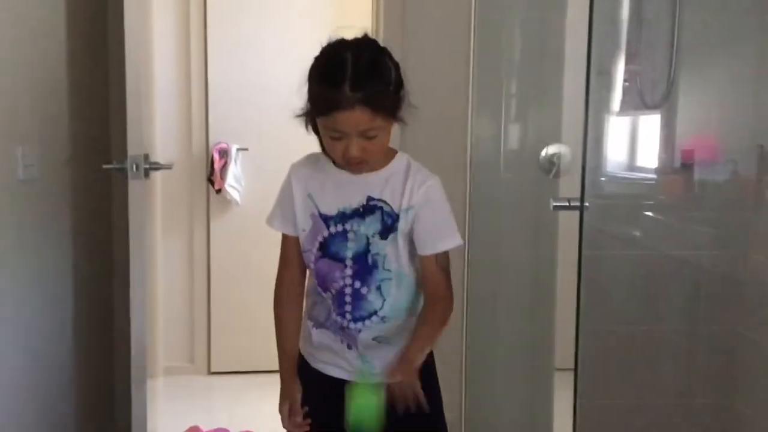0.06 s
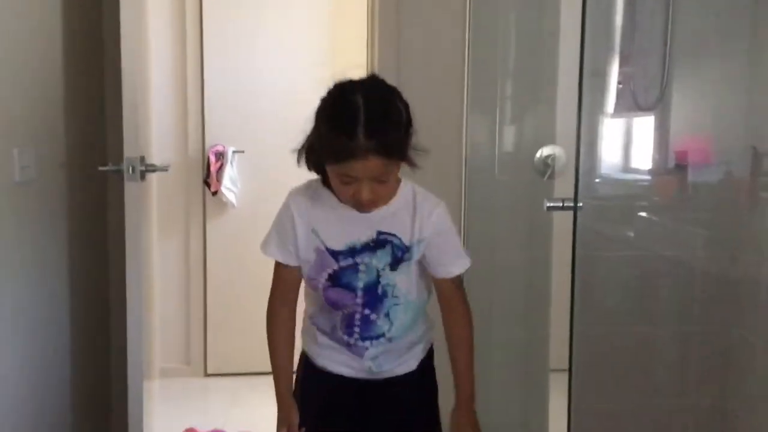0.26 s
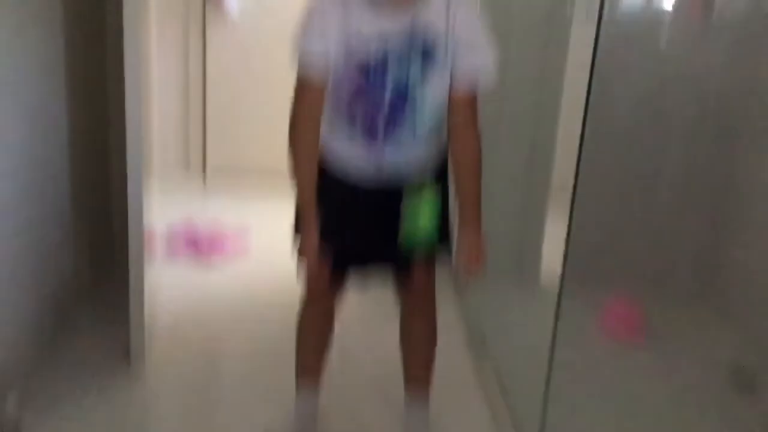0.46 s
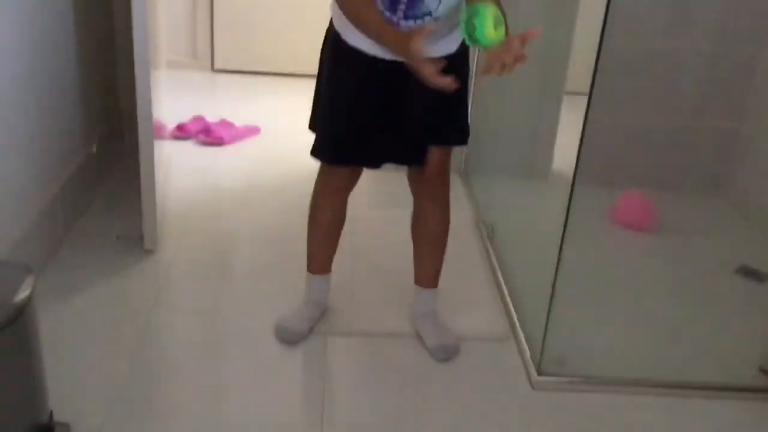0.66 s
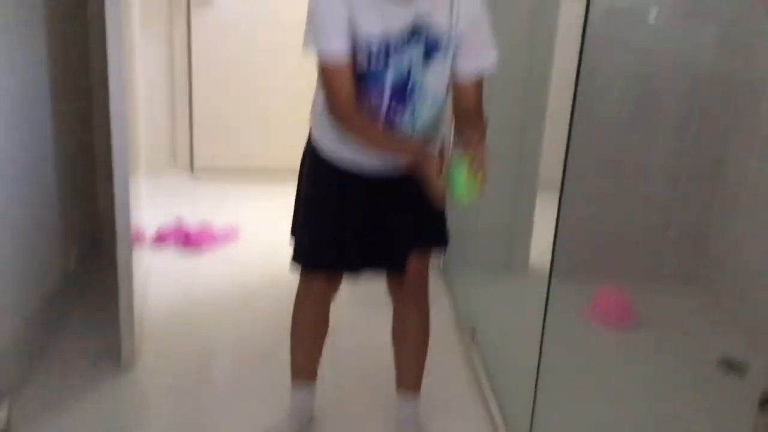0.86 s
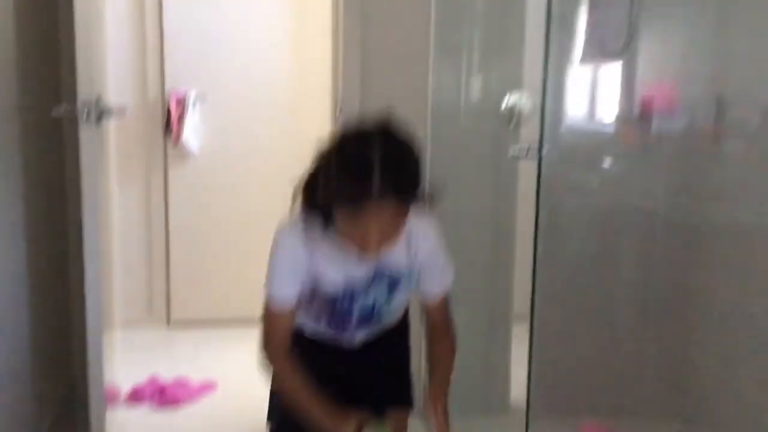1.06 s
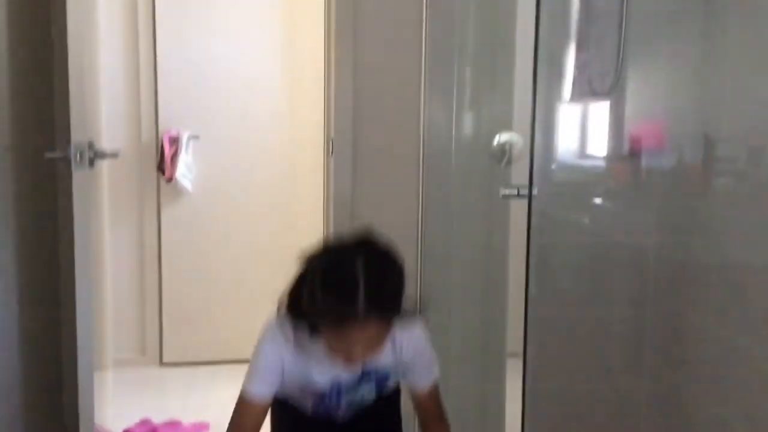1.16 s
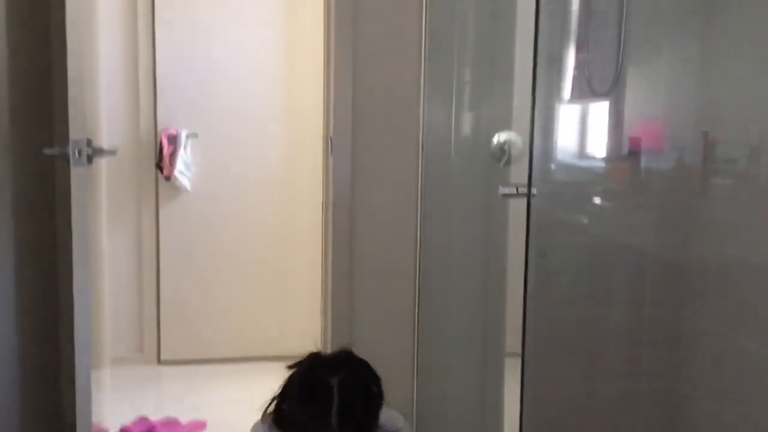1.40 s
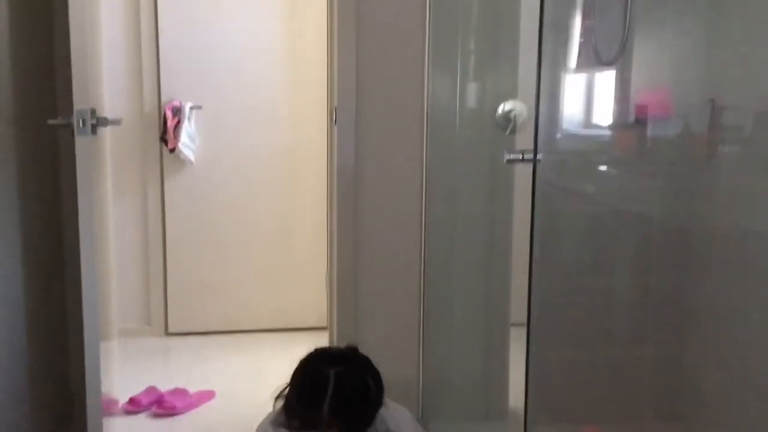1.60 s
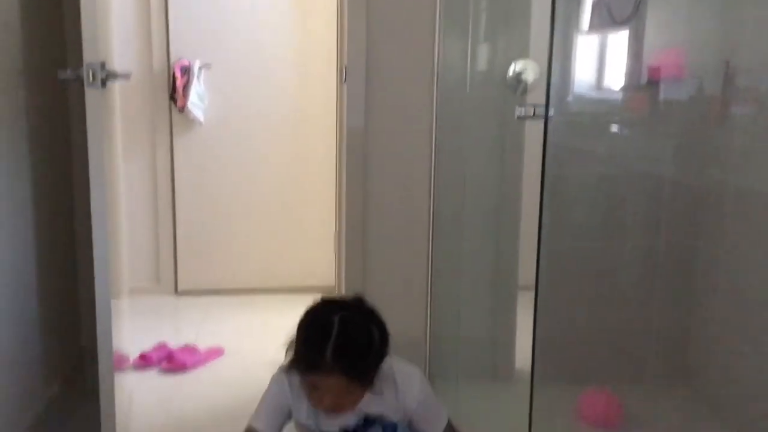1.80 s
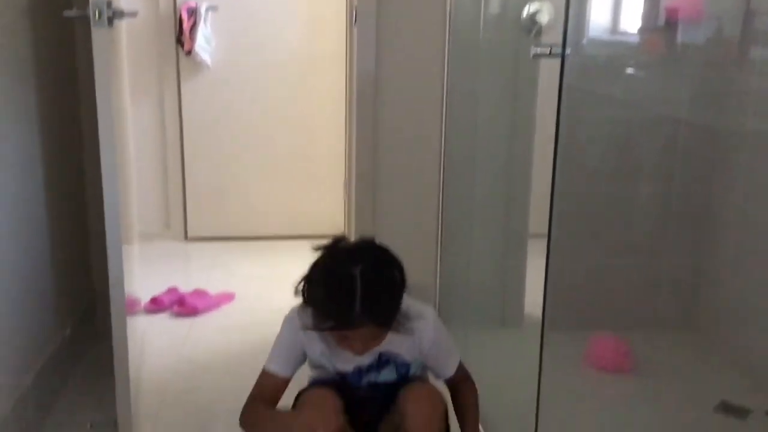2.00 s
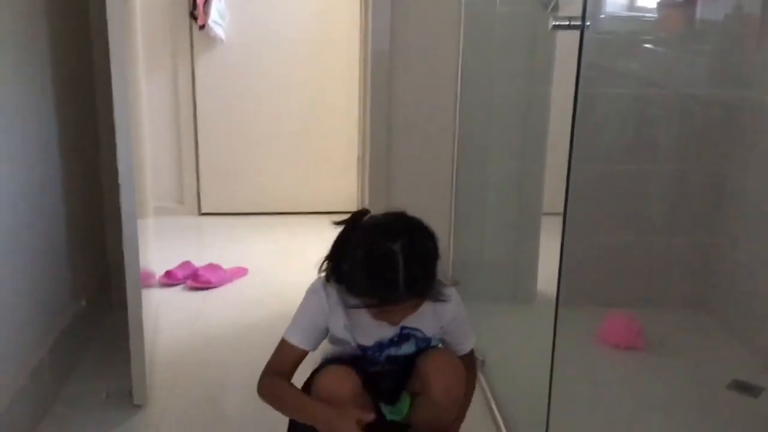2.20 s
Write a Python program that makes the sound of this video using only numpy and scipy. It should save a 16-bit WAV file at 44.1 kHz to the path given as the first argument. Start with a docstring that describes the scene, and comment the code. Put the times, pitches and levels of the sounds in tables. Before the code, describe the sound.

A small hollow ball bounces once on a tiled bathroom floor and is softly caught. Socked feet shift faintly, then the ball bounces twice more, each time quieter. The nearby knocks echo off hard walls.

```python
"""A soft footfall, then a small hollow ball bounces three times on a tiled bathroom floor.
After the first bounce it is caught in the hand. Each bounce is a knock (shell modes, contact snap)
and a low thump (air pushed by the flattening ball); hard walls echo both and the room rings on.
Socked feet shift on the tiles and clothes swish over a quiet room tone."""
import sys
import numpy as np
from scipy import signal
from scipy.fft import rfft, irfft
from scipy.io import wavfile

SR = 44100
rng = np.random.default_rng(int(sys.argv[2]) if len(sys.argv) > 2 else 0)


def wav_record(signal):
    """Record a signal, one row per channel, as 16-bit PCM in the file named by sys.argv[1]."""
    frames = np.transpose(np.atleast_2d(signal))
    bounded = np.clip(frames, -1, 1)
    # unit amplitude maps onto the largest positive 16-bit level
    quanta = np.round(bounded * 32767).astype(np.int16)
    wavfile.write(sys.argv[1], SR, quanta)


N = 99225
T = np.arange(SR) / SR

# floor impacts: t/s, knock/dB, thump/dB, upper thump/dB, presence/dB, sparkle/dB
BOUNCES = [(0.2149, -1, -2, 0.5, 1.5, 1.5), (1.5797, -6, -6.5, -2.5, 2.5, -3),
           (1.9456, -11, -7.5, -6, -2, -7)]
# ball shell modes: f/Hz, level/dB, t60/s
SHELL_MODES = [(554, -30.5, 0.043), (850, -23.5, 0.012), (1134, -16, 0.018), (1559, -13.5, 0.0027),
               (2110, -14.5, 0.0041), (2720, -25.5, 0.00322)]
# contact snap: f/Hz, level/dB
SNAP_SPECTRUM = [(100, -47), (600, -25), (1600, -4), (3000, -5), (4800, -0.5), (6500, -13), (8700, -6.5),
                 (12000, -15.5), (16000, -24)]
# air pushed by the flattening ball: f/Hz, level/dB
THUMP_SPECTRUM = [(20, -34.5), (45, -19), (75, 13.5), (130, 3.5), (250, 3), (400, -5.5), (700, -19),
                  (1400, -42.5), (8000, -97)]
# first echoes off glass, walls, ceiling: delay/s, knock/dB, thump/dB
ECHOES = [(.002, -2, -12), (.0066, -8.5, 3.5), (.0169, -10.5, 7.5), (.0182, -5, 0), (0.0278, -21.5, -5),
          (.0392, -20.5, -10.5)]
# diffuse room ring after a knock: f/Hz, level/dB
RING_SPECTRUM = [(150, -30), (330, -9), (400, -5), (470, -8.5), (560, -4.5), (660, -10), (850, -5),
                 (1080, 1.5), (1350, -5), (1900, -6.5), (2500, -11), (3200, -18.5), (4700, -18),
                 (6300, -31.5), (8800, -33), (12000, -35), (16000, -40.5)]
# diffuse room boom after a thump: f/Hz, level/dB
BOOM_SPECTRUM = [(20, -29.5), (48, -1.5), (75, -1), (110, -4.5), (150, 0.5), (190, 5.5), (220, -0.5),
                 (260, 1.5), (340, -10), (800, -65.5), (4000, -70.5)]
# reverberation time: f/Hz, t60/s
ROOM_T60 = [(60, 0.96), (250, 0.65), (1000, 0.74), (2000, 0.69), (4500, 0.57), (8000, 0.51), (15000, 0.28)]
# standing waves: f/Hz, level/dB, t60/s
ROOM_MODES = [(76.6, -28.5, 0.4), (99.4, -34, 0.37), (127.4, -43, 1), (131, -42.5, 0.64), (175.8, -31, 0.5),
              (192.2, -31.5, 0.48), (246, -24.5, 0.3), (273.5, -32, .5), (400, -49.5, 0.82),
              (567, -44, 0.53), (748, -42.5, 0.54), (947, -43.5, 0.78), (1045, -44, 0.82),
              (1053.4, -41, 0.75), (1071, -46, 0.47), (1221, -42.5, 0.84), (1314, -47, 0.37),
              (1486, -49, 0.25), (1524, -44, 0.32), (1900, -49, 0.37), (2210, -52, 0.77)]
# ball lands in the hand: t/s, click/dB, pat/dB
CATCH = [(0.4947, -34, -24)]
# fingers on the ball: f/Hz, level/dB
CLICK_SPECTRUM = [(200, -14), (1500, 0), (3000, 1), (4300, 1.5), (6500, -17), (7700, -13), (8600, -3.5),
                  (12000, -10), (16000, -28)]
# footfalls: t/s, level/dB, upper edge/Hz
STEPS = [(0.059, -33.5, 230), (.935, -38.5, 258), (0.991, -57, 110), (1.117, -32, 215),
         (1.251, -37.5, 200.4), (1.303, -31, 157), (1.446, -30.5, 574), (1.508, -36, 260)]
# cloth swells: centre t/s, width/s, level/dB
SWISHES = [(0.882, 0.042, -77), (1.02, 0.068, -76.5), (1.28, 0.077, -70)]
# cloth friction: f/Hz, level/dB
CLOTH_SPECTRUM = [(200, -1), (900, -4.5), (2100, 2), (3100, -9), (4500, -2), (6500, -17), (8800, -13.5),
                  (15000, -24)]
# room tone: f/Hz, level/dB
TONE_SPECTRUM = [(20, -32.5), (35, -10), (60, 5), (110, -3.5), (250, -4.5), (400, -13), (650, -15.5),
                 (1000, -23), (2000, -19.5), (3100, -28), (4600, -27.5), (6500, -35), (9000, -34),
                 (14000, -39), (15500, -52.5)]

RING_RISE_S, BOOM_RISE_S = 0.003, 0.005


def ball_impact(snap_db=-21, thump_db=-5.5):
    """One contact: the shell rings and snaps (knock), the flattening ball pushes air (thump)."""
    knock = ring(SHELL_MODES, alternate=True) + amp(snap_db) * pulse(SNAP_SPECTRUM)
    thump = amp(thump_db) * pulse(THUMP_SPECTRUM)
    return knock, thump


def echoes_and_modes(knock, thump, split_hz=300, wait_s=0.005, rise_s=0.0026):
    """Knock and thump, each with its wall echoes and the standing waves it excites."""
    high = knock.copy()
    low = amp(4) * thump  # direct path, weaker than its strongest echo
    for delay_s, knock_db, thump_db in ECHOES:
        add(high, delay_s, amp(knock_db) * knock)
        add(low, delay_s, amp(thump_db) * thump)
    build = 1 - np.exp(-T / rise_s)
    add(low, wait_s, build * ring([m for m in ROOM_MODES if m[0] < split_hz]))
    add(high, wait_s, build * ring([m for m in ROOM_MODES if m[0] >= split_hz]))
    return high, low


def bounces(shared_energy=0.66, ring_db=2.5, boom_db=-3):
    """The ball lands near one spot, so echoes, modes and part of the diffuse ring repeat."""
    out = np.zeros(N)
    knock, thump = echoes_and_modes(*ball_impact())
    shared = tail(RING_SPECTRUM, RING_RISE_S)
    for t_s, knock_db, thump_db, upper_db, presence_db, sparkle_db in BOUNCES:
        fresh = tail(RING_SPECTRUM, RING_RISE_S)
        diffuse = np.sqrt(shared_energy) * shared + np.sqrt(1 - shared_energy) * fresh
        boom = tail(BOOM_SPECTRUM, BOOM_RISE_S)
        bright = colour(knock + amp(ring_db) * diffuse, [(1210, 0), (4620, presence_db), (13200, sparkle_db)])
        dull = colour(thump + amp(boom_db) * boom, [(127, 0), (260, upper_db)])
        add(out, t_s, amp(knock_db) * bright + amp(thump_db) * dull)
    return out


def catch(click_decay_s=0.00024, room_db=-4):
    """Fingers click on the ball, the palm pats it; both reverberate."""
    out = np.zeros(N)
    for t_s, click_db, pat_db in CATCH:
        burst = rng.standard_normal(SR) * np.exp(-T / click_decay_s)
        click = unit(colour(burst, CLICK_SPECTRUM)) + amp(room_db) * tail(CLICK_SPECTRUM, RING_RISE_S)
        pat = pulse(THUMP_SPECTRUM) + tail(BOOM_SPECTRUM, BOOM_RISE_S)
        add(out, t_s, amp(click_db) * click + amp(pat_db) * pat)
    return out


def steps(rise_s=0.006, t60_s=0.25, low_hz=66.9):
    """Socked feet make dull thuds that linger in the room."""
    out = np.zeros(N)
    envelope = (1 - np.exp(-T / rise_s)) * amp(-60 * T / t60_s)
    for t_s, level_db, edge_hz in STEPS:
        band = signal.butter(5, [low_hz, edge_hz], "band", fs=SR, output="sos")
        thud = signal.sosfilt(band, envelope * rng.standard_normal(SR))
        add(out, t_s, amp(level_db) * unit(thud))
    return out


def clothes():
    """Cloth slides over cloth as the child bends and crouches."""
    t = np.arange(N) / SR
    swell = sum(amp(db) * np.exp(-((t - centre_s) / width_s) ** 2) for centre_s, width_s, db in SWISHES)
    noise = colour(rng.standard_normal(N), CLOTH_SPECTRUM)
    return swell * noise / noise.std()


def room_tone(level_db=-68):
    """Steady low rumble and faint hiss."""
    gain = amp(lookup(TONE_SPECTRUM, np.fft.rfftfreq(N, 1 / SR)))
    noise = irfft(rfft(rng.standard_normal(N)) * gain, N)
    return amp(level_db) * noise / noise.std()


def tail(spectrum, rise_s):
    """Dense reflections build up and die away, treble first; unit energy."""
    f_hz, t_s, bins = signal.stft(rng.choice([-1., 1.], SR), SR, nperseg=256)
    decay = amp(-60 * t_s / lookup(ROOM_T60, f_hz)[:, None])
    dying = signal.istft(bins * decay, SR, nperseg=256)[1][:SR]
    return unit(colour(dying * (1 - np.exp(-T / rise_s)), spectrum))


def ring(modes, alternate=False):
    """Decaying sines; shell modes swing in alternate directions."""
    signs = (-1) ** (np.arange(len(modes)) * alternate)
    return sum(sign * amp(db - 60 * T / t60_s) * np.sin(2 * np.pi * f_hz * T)
               for sign, (f_hz, db, t60_s) in zip(signs, modes))


def pulse(spectrum):
    """Unit-energy click with the given spectrum."""
    return unit(colour(1. * (T == 0), spectrum))


def colour(x, spectrum):
    """Minimum-phase filter through (f/Hz, level/dB) points."""
    f_hz = abs(np.fft.fftfreq(8192, 1 / SR))
    log_gain = np.log(amp(lookup(spectrum, f_hz)))
    taps = np.fft.ifft(np.exp(np.conj(signal.hilbert(log_gain)))).real
    return signal.fftconvolve(x, taps[:len(taps) // 2])[:len(x)]


def lookup(points, f_hz):
    """Interpolate a table over log frequency."""
    knots_hz, values = np.transpose(points)
    return np.interp(np.log(f_hz + 1), np.log(knots_hz + 1), values)


def amp(db):
    """dB to gain."""
    return 10 ** (np.asarray(db) / 20)


def unit(x):
    """Scale to unit energy."""
    return x / np.sqrt(np.sum(x ** 2) + 1e-20)


def add(mix, t_s, sound):
    """Mix a sound in at t_s."""
    part = mix[round(t_s * SR):][:len(sound)]
    part += sound[:len(part)]


def scene():
    """All sources, mono."""
    return (bounces() + catch() + steps() + clothes() + room_tone())[None]


def record(dry):
    """Microphone bass cut at 34 Hz, band limit at 15.8 kHz."""
    thinned = signal.sosfilt(signal.butter(2, 34, "high", fs=SR, output="sos"), dry)
    lowpass = signal.firwin(511, 15800, window=("kaiser", 9), fs=SR)
    return signal.oaconvolve(thinned, lowpass[None], "same")


dry = scene()
out = record(dry)
wav_record(out)
```